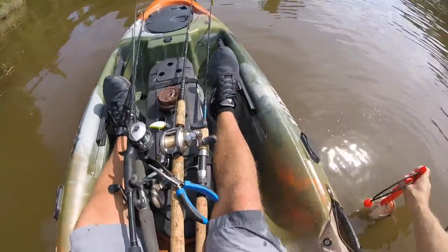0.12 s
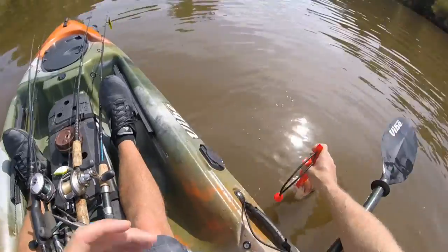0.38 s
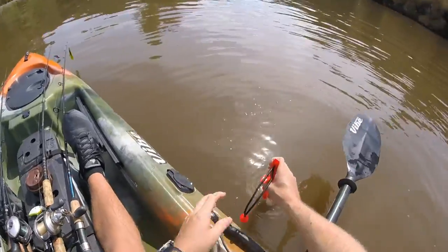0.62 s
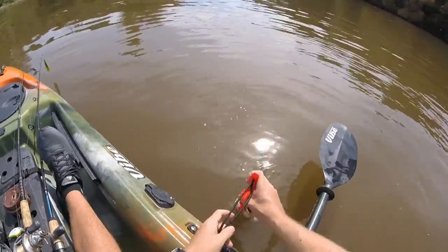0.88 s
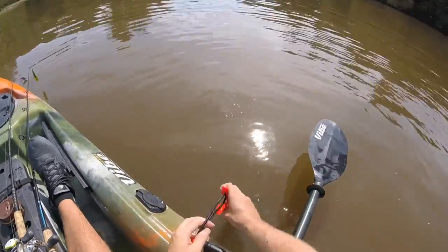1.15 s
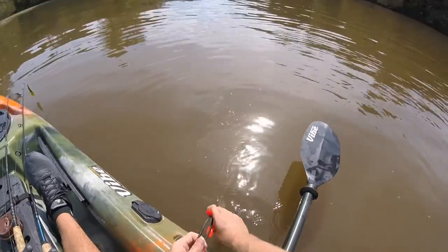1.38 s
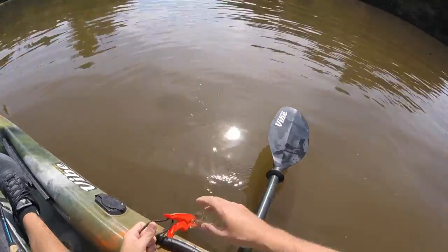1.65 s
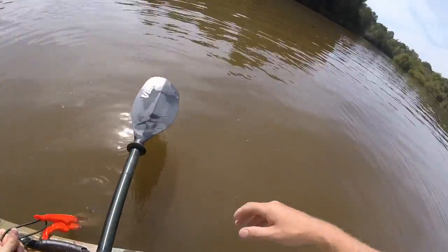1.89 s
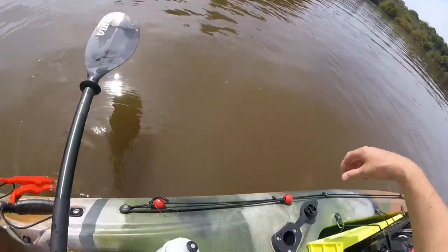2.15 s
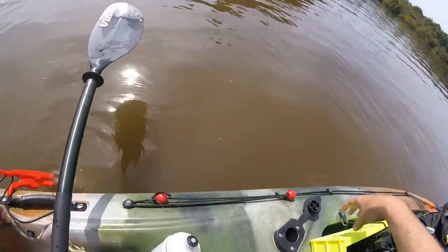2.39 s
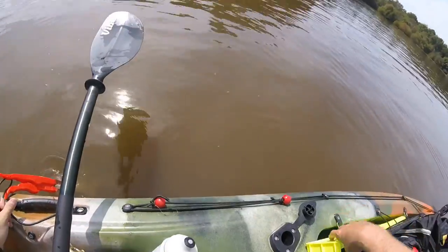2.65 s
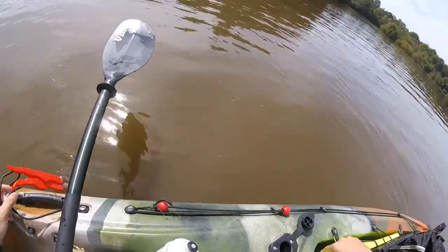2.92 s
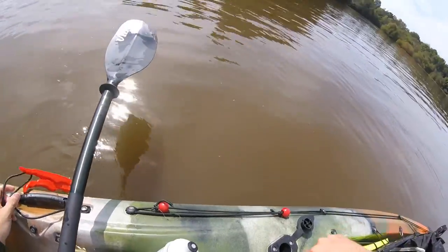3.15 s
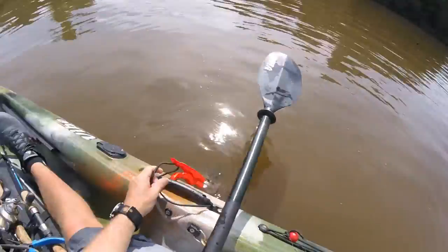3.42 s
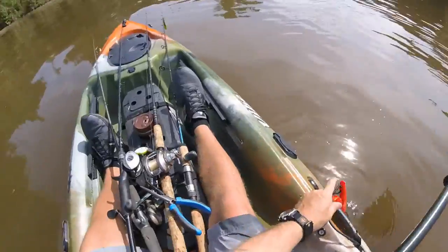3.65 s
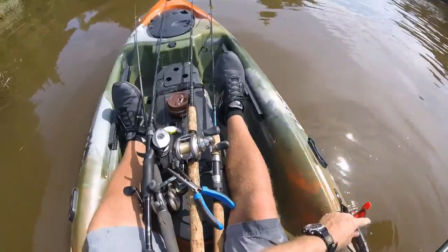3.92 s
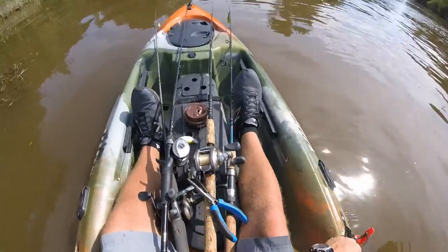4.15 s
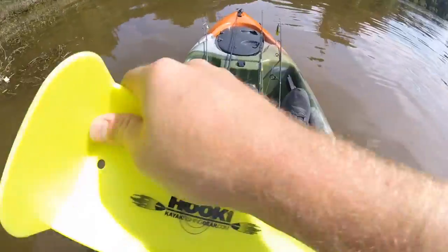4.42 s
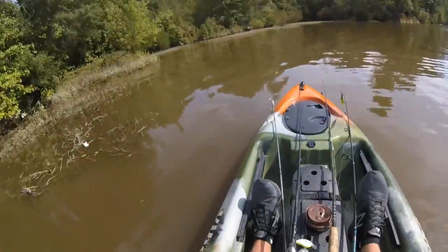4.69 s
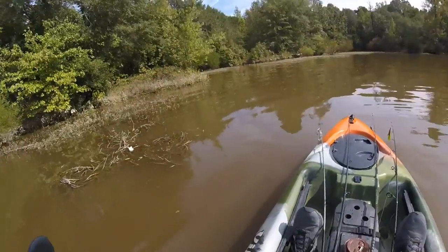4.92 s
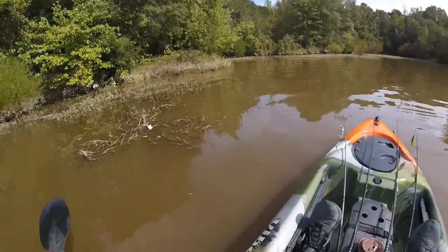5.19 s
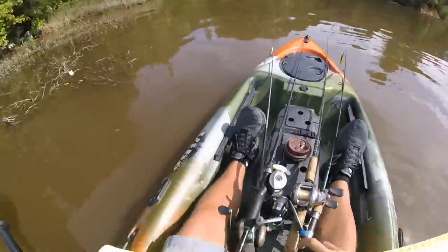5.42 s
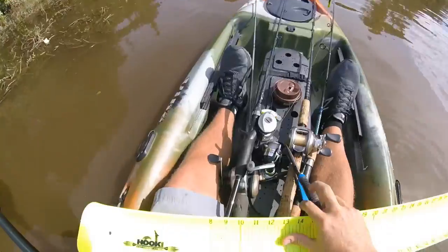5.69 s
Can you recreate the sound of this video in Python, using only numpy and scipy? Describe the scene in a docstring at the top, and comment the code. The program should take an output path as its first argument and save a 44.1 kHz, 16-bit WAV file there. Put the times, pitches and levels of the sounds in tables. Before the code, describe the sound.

Fishing gear clicks and knocks against a hollow plastic kayak, building to a hard clattering scuffle and a sharp knock, over faint breeze and insects.

```python
"""Clips and plastic parts click and knock on a hollow plastic kayak: snaps ring the parts and the hull.
A measuring board is dragged out and set down and cloth rustles: grainy noise swells with loose ticks.
Small hard parts or drops ring short sine notes. A light breeze buffets the microphone as low noise,
and insects hiss in the far trees of a calm river as a narrow noise band over the hush of the open air.
A small camera housing colours the near sounds with its cavity."""
import sys
import numpy as np
from scipy import signal
from scipy.io import wavfile
from scipy.ndimage import uniform_filter1d

SR = 44100
rng = np.random.default_rng(int(sys.argv[2]) if len(sys.argv) > 2 else 0)


def wrap_up_sound(samples):
    """Save the sound to the file named by the first command line argument, as 16-bit audio."""
    columns = np.atleast_2d(samples).T
    # keep every value between -1 and 1, then stretch to whole-number steps
    tamed = np.clip(columns, -1, 1)
    steps = np.round(tamed * 32767).astype(np.int16)
    wavfile.write(sys.argv[1], SR, steps)


def boost(x):
    """Linear amplitude factor 10**(x/20) for a level x in decibels (scalar or array-like)."""
    u = np.asarray(x, float) / 20
    return 10 ** u


N = 256197  # length in samples

# gear on gear: (t/s, clack level/dB, struck part f/Hz, bright tick level/dB)
CLICKS = [(0.171, -47.5, 970, -42.5), (0.202, -47, 1020, -49.5), (1.0124, -24, 3070, -32),
          (1.022, -33.5, 2120, -46), (1.05, -39, 2100, -43), (1.3723, -38, 6050, -39.5),
          (1.4184, -34, 2980, -43.5), (1.591, -39, 1520, -69), (1.803, -37.5, 2780, -46),
          (2.231, -36, 3040, -52.5), (2.4943, -48, 2840, -47.5), (3.56, -36, 5000, -40),
          (4.564, -42, 953, -52), (5.226, -38, 3900, -49), (5.2745, -20, 3660, -31),
          (5.486, -47, 1500, -59), (5.655, -35.5, 1630, -50)]
# gear on the hull: (t/s, clack level/dB, struck part f/Hz, bright tick level/dB, hull thump level/dB)
KNOCKS = [(0.5733, -37, 1780, -41, -47), (0.6295, -36, 4400, -44, -52), (1.0632, -37.5, 2720, -43.5, -46),
          (1.703, -37, 2280, -39.5, -49), (1.726, -20, 1030, -45, -35.5), (1.7574, -55, 920, -46, -38),
          (1.7705, -28, 2820, -32.5, -59), (1.7853, -37, 2800, -51, -46), (2.3126, -28, 1840, -43, -44),
          (2.323, -30, 1010, -54, -45), (2.519, -28, 905, -60, -33), (2.6303, -40.5, 830, -76, -50),
          (2.8858, -64, 1930, -72, -37), (2.898, -38.5, 1750, -47, -40), (2.9188, -46, 990, -47, -46),
          (3.206, -22, 1750, -39, -57), (3.2579, -18, 1090, -41, -37), (3.414, -13.5, 1160, -24, -33),
          (3.4625, -9, 1330, -27.5, -42), (3.4735, -35, 1860, -37, -31), (3.484, -13.5, 790, -28.5, -34),
          (3.5752, -19.5, 860, -25.5, -32.5), (3.5972, -21.5, 1000, -26, -29.5),
          (3.61, -14, 2800, -18.5, -28.5), (3.6267, -16, 1180, -15.5, -27.5),
          (3.6524, -18.5, 1180, -19.5, -32.5), (3.7218, -7, 4540, -11, -30),
          (3.7946, -10.5, 3100, -23.5, -29.5), (3.8493, -19, 1020, -32.5, -33),
          (3.863, -42, 6100, -38, -55), (4.4624, -34, 1080, -48, -48.5), (4.624, -7.5, 1460, -22, -15),
          (4.6326, -21, 2180, -24.5, -28), (4.6399, -14.5, 1490, -20.5, -44),
          (4.6527, -16, 1310, -26.5, -21), (4.79, -27, 1980, -39.5, -32.5), (4.81, -25.5, 960, -42, -36),
          (4.8196, -19, 1750, -36, -27.5), (4.87, -49, 900, -67, -31), (5.041, -53, 608, -71, -55.5),
          (5.088, -62, 600, -75, -58), (5.1952, -20, 1750, -40, -24), (5.209, -38, 1000, -48, -37.5),
          (5.302, -33, 3100, -42.5, -45), (5.3255, -27.5, 1014, -72, -30.5),
          (5.3688, -30.5, 2460, -34, -36.5), (5.5208, -39, 910, -72, -49.5), (5.678, -31, 1940, -44, -41),
          (5.7132, -33.5, 1420, -34, -38)]
CLICK_THUMP_DB = -27  # what a click passes on to the hull, relative to its clack


def hits():
    """Each blow is a sharp snap with a gritty tail that rings the struck part, the hull and the cavity."""
    out = np.zeros(N + SR)
    t = np.arange(SR // 3) / SR
    clicks = [row + (row[1] + CLICK_THUMP_DB,) for row in CLICKS]
    for start, clack_db, part_hz, tick_db, thump_db in KNOCKS + clicks:
        grit = rng.standard_normal(len(t))
        spread = rng.standard_normal((2, 8))
        snap = 3.0 * signal.unit_impulse(len(t), 12) + grit * boost(-60 * t / 0.005)
        contact = snap + grit * boost(1 - 60 * t / 0.047)
        crack = snap + grit * boost(-5 - 60 * t / 0.022)
        clack = part_clack(contact, crack, part_hz, clack_db)
        tick = cavity_tick(crack, snap)
        thump = hull_thump(snap, grit, start, spread, t)
        blow = boost(clack_db) * clack / abs(clack).max()
        blow += boost(tick_db) * tick / np.std(tick[:220])
        blow += boost(thump_db) * thump / np.std(thump[:900])
        out[round(start * SR):][:len(t)] += blow
    # soft plastic gives little above the cavity, and the hull is too small for deep bass
    band = signal.butter(6, [90, 8600], "band", fs=SR, output="sos")
    return signal.sosfilt(band, out[:N])


# resonances of the gear: (f/Hz, width/Hz, level/dB)
GEAR = [(1180, 84, 8), (1767, 310, -2.5), (3480, 1030, 2.5)]


def part_clack(contact, crack, part_hz, clack_db):
    """The contact rings the gear resonances, strongest near the pitch of the struck part."""
    bands = [(hz, width, db - 6 * abs(np.log2(hz / part_hz))) for hz, width, db in GEAR]
    bands.append((part_hz, 0.63 * part_hz, 3.0))
    # neighbouring resonances alternate in sign
    body = sum((-1) ** k * boost(db) * resonate(contact, hz, width) for k, (hz, width, db) in enumerate(bands))
    # light taps ring on their own pitch, hard blows crack across the band
    pitch_db = np.clip(-0.8 * clack_db - 12, 5, 15)
    pitch = resonate(crack, part_hz, 0.12 * part_hz)
    return resonate(body, part_hz, 2.5 * part_hz) + boost(pitch_db) * pitch


# cavity before the microphone: (f/Hz, width/Hz, level/dB)
HOUSING = [(5250, 900, 0), (6490, 220, 3), (8000, 1800, -22)]


def cavity_tick(crack, snap):
    """The crack excites the small air cavity of the housing, with the snap itself heard directly."""
    tick = 6 * 0 * crack
    for k, (hz, width, db) in enumerate(HOUSING):
        mode = resonate(resonate(crack, hz, width), hz, 5 * width)
        tick += (-1) ** k * boost(db) * mode
    return tick + boost(-6) * resonate(snap, 4400, 3500)


# modes of the hull, before their scatter from blow to blow: (f/Hz, level/dB, t60/s)
HULL = [(137.4, -7, 0.099), (210, -25.5, 0.4), (237.4, -5, 0.54), (309, -12, 0.2), (400, -2, 0.065),
        (505, -4.5, 0.23), (662, -22, 0.07)]
# boom pitch of the part of the hull where the hands are at work, before scatter: (t/s, f/Hz)
SPOT = [(0.6, 399), (1.1, 205), (1.76, 149), (1.95, 457), (2.52, 381.5), (2.9, 309), (3.27, 251),
        (3.42, 520), (3.6, 400), (3.8, 468), (4.5, 420), (4.62, 400), (4.655, 209), (4.82, 480),
        (4.87, 238), (5.04, 492), (5.19, 335), (5.21, 335), (5.35, 235.5), (5.7, 307)]
SPOT_SCATTER_OCT = 0.04  # standard deviation in octaves


def hull_thump(snap, grit, start, spread, t):
    """Every spot of the hull has its own short boom and favours the long modes near it."""
    spot_hz = np.interp(start, *np.transpose(SPOT)) * 2 ** (SPOT_SCATTER_OCT * spread[1, -1])
    modes = []
    for (hz, db, t60), scatter in zip(HULL, spread[1]):
        modes.append((hz, db + 2.5 * scatter - 12 * abs(np.log2(hz / spot_hz)), t60))
    modes.append((spot_hz, 9, 0.11))
    detune = np.append(1 + 0.021 * spread[0, :len(HULL)], 1)
    boom = signal.oaconvolve(snap[:2000], ring(modes, detune, t))[:len(t)]
    # the many small modes of the shell blur into a short dull rumble
    rumble = resonate(grit[::-1], spot_hz, 0.7 * spot_hz)
    rumble = resonate(rumble, spot_hz, 1.5 * spot_hz)
    rumble *= boost(-60 * t / 0.12) * np.minimum(t / 0.002, 1)
    return boom / np.std(boom[:900]) + boost(-7) * rumble / np.std(rumble[:900])


def ring(modes, detune, t):
    """Dying sines of one blow, scaled to peak 1."""
    x = sum(boost(db - 60 * t / t60) * np.sin(2 * np.pi * hz * d * t) for (hz, db, t60), d in zip(modes, detune))
    return x / abs(x).max()


# dragging and rustling strokes, levels before the softer strokes are dulled:
# (t/s of most pressure, rise/s, fall/s, body level/dB, bright hiss level/dB)
STROKES = [(0.25, 0.21, 0.75, -51.5, -81), (0.72, 0.51, 0.2, -52, -58), (1.035, 0.024, 0.17, -50.5, -55),
           (1.739, 0.031, 0.06, -37.5, -75), (1.968, 1, 0.77, -49, -63), (2.58, 0.21, 0.14, -43.5, -72),
           (3.061, 0.17, 0.29, -34.5, -41.5), (3.254, 0.1, 0.05, -26, -36),
           (3.44, 0.16, 0.13, -28.5, -45.5), (3.638, 0.087, 0.051, -23.5, -80),
           (3.77, 0.13, 0.15, -34, -58.5), (3.875, 0.052, 0.069, -35, -55), (4.15, 0.24, 0.31, -54, -56),
           (4.462, 0.17, 0.32, -41.5, -61), (4.828, 0.043, 0.092, -25.5, -55),
           (5.208, 0.02, 0.034, -34, -40.5), (5.28, 0.018, 0.039, -40, -49),
           (5.339, 0.056, 0.083, -31, -57), (5.71, 0.084, 0.1, -40, -60)]
# spectrum of the dull body: (f/Hz, level/dB per Hz)
RUB_BODY = [(59, -23.5), (100, -1), (346, -6), (819, -12), (945, -13.5), (1280, -17), (2100, -19.5),
            (2900, -19), (3900, -26.5), (5850, -26.5), (9900, -120)]
# spectrum of the bright hiss: (f/Hz, level/dB per Hz)
RUB_HISS = [(3000, -18.5), (4200, -5), (5250, -5.5), (5800, -10), (6400, 3), (7000, -21), (8000, -15),
            (10000, -28.5), (14000, -78)]


def rubbing():
    """Stick-slip friction: slightly grainy noise, a dull body through the hull and a bright hiss."""
    slips = boost(3.5 * np.minimum(rng.exponential(1, N), 3)) * (rng.random(N) < 300 / SR)
    slips = signal.lfilter([1], [1, -0.99], slips)
    grains = evened(1 + 0.25 * uniform_filter1d(slips, size=12))
    rough = noise(RUB_BODY, patchy_db=2.4, size=512)
    at, rise, fall, body_db, hiss_db = np.transpose(STROKES)
    body_gain = bumps(at, rise, fall, body_db)
    hiss_gain = bumps(at, rise, fall, hiss_db)
    # a stroke with little hiss is soft, and its body is duller too
    bright = np.clip((20 * np.log10(hiss_gain / body_gain) + 36) / 24, 0, 1)
    dull = signal.sosfilt(signal.butter(2, 1300, fs=SR, output="sos"), rough)
    body = (bright * rough + (1 - bright) * dull) * body_gain
    hiss = noise(RUB_HISS, patchy_db=2.2, size=512) * hiss_gain
    return (body + hiss) * grains + clatter(bright * body_gain)


CLATTER_PER_S, CLATTER_DB = 110, -17.5  # mean tick rate, level relative to the bright body of a stroke


def clatter(pressure):
    """Loose parts tick at random while gear is moved, each ringing one gear or housing mode."""
    size = boost(5.0 * np.minimum(rng.exponential(1, N), 3)) * (rng.random(N) < CLATTER_PER_S / SR)
    modes = GEAR + HOUSING[:2]
    part = rng.integers(0, len(modes), N)
    ticks = np.zeros(N)
    for k, (hz, width, _) in enumerate(modes):
        ticks += evened(resonate(size * (part == k), hz, max(width, 400)))
    ticks = signal.sosfilt(signal.butter(4, 7500, fs=SR, output="sos"), ticks)
    return boost(CLATTER_DB) * evened(ticks) * pressure


# small hard parts or drops that ring one short note: (t/s, peak level/dB, f/Hz, t60/s)
PIPS = [(0.3163, -46, 3220, .015), (0.91, -51, 1900, .015), (0.963, -39, 4700, 0.011),
        (1.162, -49, 1150, 0.0074), (1.172, -46.5, 1540, .012), (1.202, -38.5, 1640, 0.02),
        (1.264, -54.5, 5650, 0.0091), (1.319, -48.5, 5730, .012), (1.374, -31, 3150, 0.0072),
        (1.379, -34, 5800, 0.014), (1.383, -35, 3000, 0.0084), (1.409, -36.5, 3400, 0.011),
        (1.4186, -36.5, 1265, 0.03)]


def pips():
    """Each pip is one soft-starting dying sine with a faint snap."""
    out = np.zeros(N + SR)
    t = np.arange(SR // 10) / SR
    snap = resonate(signal.unit_impulse(len(t), 12), 4000, 5000)
    snap = boost(-9) * snap / abs(snap).max()
    for start, db, hz, t60 in PIPS:
        note = np.sin(2 * np.pi * hz * t) * boost(-60 * t / t60) * (1 - np.exp(-t / 0.00025))
        out[round(start * SR):][:len(t)] += boost(db) * (note / abs(note).max() + snap)
    return out[:N]


# drifting air flow: (t/s, level/dB)
BREEZE = [(0, -37), (0.35, -43.5), (1.2, -47), (2.0, -42), (2.5, -46.5), (3.5, -37.5), (4.1, -46),
          (4.5, -40.5), (5.1, -49), (5.81, -43.5)]
# spectrum of the wind noise: (f/Hz, level/dB per Hz)
BREEZE_COLOUR = [(10, 7), (30, -0.5), (55, 0.5), (110, -4.5), (250, -31.5), (2000, -80.5)]
# puffs and jolts on the microphone port: (t/s, half length/s, level/dB)
PUFFS = [(0.028, 0.11, -34), (0.152, 0.091, -31.5), (1.763, 0.14, -35.5), (3.288, 0.036, -27.5),
         (3.436, 0.17, -37), (4.658, 0.094, -27.5), (5.397, 0.069, -29.5), (5.516, 0.099, -24),
         (5.685, 0.031, -28)]


def breeze():
    """Lumpy low pressure swings on the microphone port: a drifting air flow with short puffs."""
    at, half, db = np.transpose(PUFFS)
    level = np.hypot(boost(curve(BREEZE, 1)), bumps(at, half, half, db))
    return noise(BREEZE_COLOUR, patchy_db=1.5, size=2048) * level


# far chorus, heard softer once the camera turns up: (t/s, level/dB, centre f/Hz)
INSECTS = [(0, -56, 6890), (4.55, -56.5, 6920), (4.7, -62, 6930), (5.81, -58.5, 6900)]
# spectrum of the open air: (f/Hz, level/dB per Hz)
AIR = [(90, 1.5), (150, 8), (600, -2.5), (2200, -8), (3200, -12.5), (4300, -13.5), (6000, -50),
       (9000, -17.5), (13500, -21.5), (15000, -94)]
AIR_DB = -1  # relative to the insects


def insects():
    """A far chorus blurs into one smooth band of hiss over the hush of the open air."""
    centre = curve(INSECTS, 2)
    band = resonate(rng.standard_normal(N), centre, 1140)
    band = resonate(band, centre, 1140)
    air = boost(AIR_DB) * noise(AIR, patchy_db=3.5)
    return (evened(band) + air) * boost(curve(INSECTS, 1))


def evened(x):
    """Scales to rms 1."""
    return x / np.sqrt(np.mean(x ** 2) + 1e-20)


def curve(rows, column):
    """One column of a curve at every sample."""
    rows = np.array(rows)
    return np.interp(np.arange(N) / SR, rows[:, 0], rows[:, column])


def resonate(x, hz, width):
    """Shifts hz (fixed or a curve) down to zero, smooths, and shifts back: a resonance of gain 1."""
    turn = np.exp(2j * np.pi * np.cumsum(hz * np.ones(len(x))) / SR)
    r = np.exp(-np.pi * width / SR)
    return 2 * (turn * signal.lfilter([1 - r], [1, -r], x / turn)).real


def noise(colour, patchy_db, size=1024):
    """Random short-time spectra of a given colour with drifting patches, at rms 1."""
    frames = 4 * N // size + 5
    bin_hz = np.fft.rfftfreq(size, 1 / SR)
    real, imag, patches = rng.standard_normal((frames, len(bin_hz), 3)).T
    patches = evened(uniform_filter1d(uniform_filter1d(patches, 10, 0), 8, 1))
    hz, db = np.transpose(colour)
    colour_db = np.interp(np.log(bin_hz + 1), np.log(hz + 1), db)[:, None]
    spectra = (real + 1j * imag) * boost(colour_db + patchy_db * patches)
    return evened(signal.istft(spectra, nperseg=size, noverlap=3 * size // 4)[1][:N])


STROKE_ENDS_DB, STROKE_SHAPE = -23, 1.29  # level one rise or fall off the top; 1 = pointed, 2 = round


def bumps(at, rise, fall, db):
    """Gain curve of swells that rise to db at their time and fall again, summed in power."""
    t = np.arange(0, N + 64, 64)[:, None] / SR - at
    away = np.where(t < 0, -t / rise, t / fall) ** STROKE_SHAPE
    power = (boost(np.maximum(db + STROKE_ENDS_DB * away, -140)) ** 2).sum(1)
    return np.interp(np.arange(N), np.arange(len(t)) * 64, np.sqrt(power))


def scene():
    """All sources in the open air, with no room; near sounds lose a band below the housing cavity."""
    near = hits() + rubbing()
    near = near - 0.55 * resonate(near, 4150, 1000)
    return (near + pips() + breeze() + insects())[None]


def low_pass(x):
    """Removes everything above the highest recorded frequency."""
    return signal.sosfilt(signal.butter(12, 14030, fs=SR, output="sos"), x)


def record(dry):
    """Passes the finished mix on at its own level."""
    return low_pass(dry)


dry = scene()
out = record(dry)
wrap_up_sound(out)
```